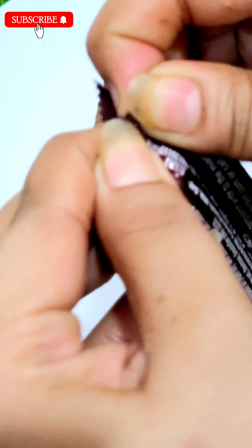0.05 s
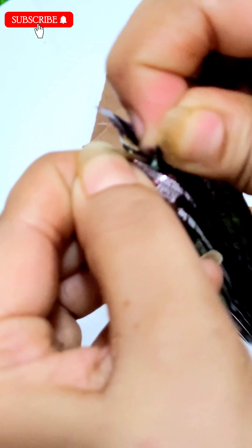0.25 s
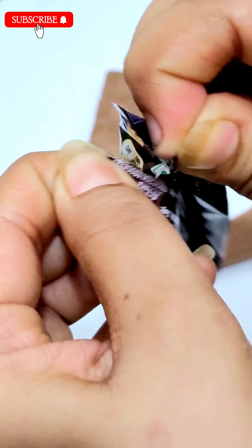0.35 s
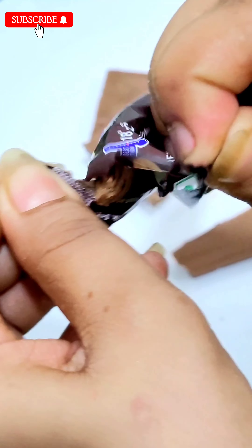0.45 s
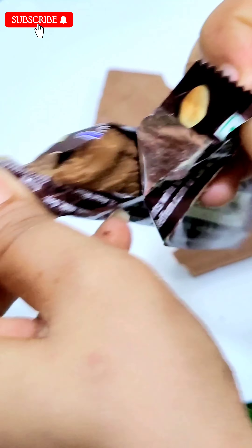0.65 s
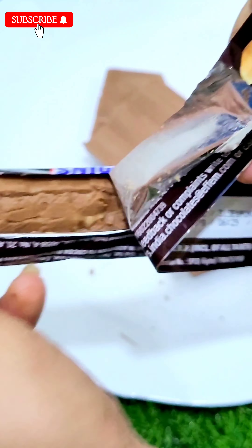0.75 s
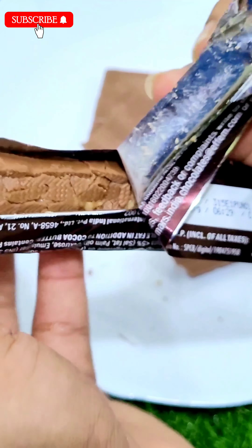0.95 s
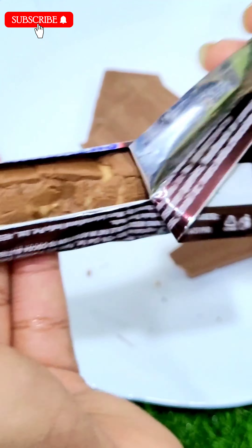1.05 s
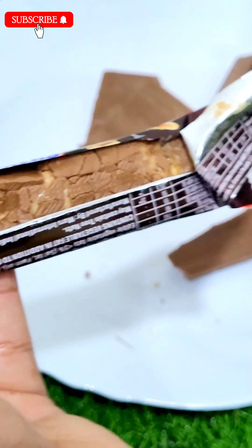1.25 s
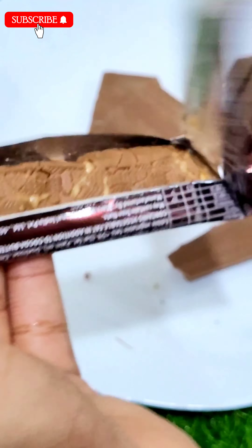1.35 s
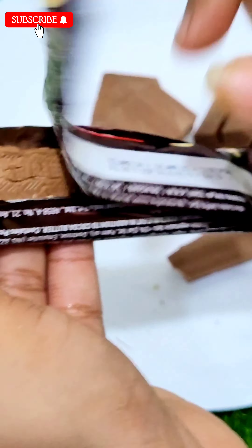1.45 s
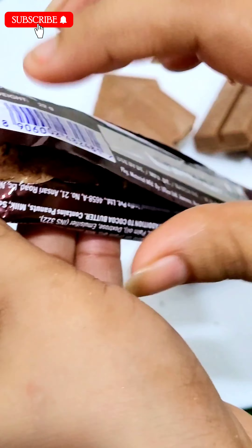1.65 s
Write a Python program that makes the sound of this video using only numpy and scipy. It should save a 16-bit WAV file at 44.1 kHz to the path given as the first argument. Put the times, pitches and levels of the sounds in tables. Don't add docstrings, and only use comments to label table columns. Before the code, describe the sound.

Plastic wrapper crinkling, close and crisp in stereo. Small ticks and faint rustles until 0.4 s, with a few sharper snaps; then dense bright crackling to 0.6 s, loudest crack near 0.53. Another hard tearing burst at 0.7-0.8 s, a brief lull, soft crackles and a dull finger knock near 1.05, brisk snapping 1.15-1.3, a small crackle at 1.4, then near quiet with low room hum.

```python
import sys
import numpy as np
from scipy import signal
from scipy.fft import rfft, irfft, next_fast_len
from scipy.io import wavfile
from scipy.ndimage import map_coordinates

SR = 44100
rng = np.random.default_rng(int(sys.argv[2]) if len(sys.argv) > 2 else 0)


def store_pcm(level_fs):
    pcm = np.round(np.clip(level_fs, -1, 1) * 32767).astype(np.int16)
    wavfile.write(sys.argv[1], SR, np.atleast_2d(pcm).T)


def convert_level_to_amplitude(level_db):
    exponent = np.asarray(level_db, float) / 20
    return 10 ** exponent


N = 74970

# centre_hz, width_hz, level_db
POUCH_MODES = [(930, 1020, -8.5), (1345, 382, 1), (2055, 490, -2)]
FILM_SHARED = 0.21
FOLD_WIDTH = 0.39
FILM_TOP_HZ = 15900


def unit(x):
    return x / np.sqrt(np.mean(x ** 2) + 1e-20)


def along(points, hz):
    point_hz, value = np.transpose(points)
    return np.interp(np.log(hz + 1), np.log(point_hz + 1), value)


def curves(rows):
    seconds, *columns = np.transpose(sorted(rows))
    return [np.interp(np.arange(N) / SR, seconds, column) for column in columns]


def wobble(knots_per_s):
    knots = rng.standard_normal(int(N * knots_per_s / SR) + 4)
    return map_coordinates(knots, [np.arange(N) * knots_per_s / SR])


def filtered(x, response):
    n = x.shape[-1]
    size = next_fast_len(n + 4096)
    return irfft(rfft(x, size) * response(np.fft.rfftfreq(size, 1 / SR)), size)[..., :n]


def resonances(modes):
    def response(f):
        total = 0
        for k, (centre, width, db) in enumerate(modes):
            damping = 1j * f * width
            total = total + (-1) ** k * convert_level_to_amplitude(db) * damping / (centre * centre - f * f + damping)
        return total
    return response


def pair(n, share):
    noise, share = rng.standard_normal((3, n)), np.clip(share, 0, 1)
    return np.sqrt(share) * noise[0] + np.sqrt(1 - share) * noise[1:]


def film(f):
    # hz, level_db
    film_colour = [(900, -23), (1600, -20), (2300, -12.5), (3500, -3), (5400, -3.5), (8700, -11),
                   (15600, -10), (16000, -56)]
    return convert_level_to_amplitude(along(film_colour, f))


def thin(f):
    return (1j * f / (2400 + 1j * f)) ** 2


def pouch(f, modes=POUCH_MODES):
    pan_db = 2 * np.array([[-1], [1]])
    return resonances(modes)(f) ** 2 * convert_level_to_amplitude(pan_db)


def pooled(x):
    return x + 0.65 * x.mean(axis=0)


def snaps():
    # start_s, peak_db, pitch_hz,
    # hollow_db (ring of the pouch)
    crease_snaps = [(0.0142, -33, 4420, -13.5), (0.0432, -23.5, 11940, -46), (0.0977, -33, 4720, -64),
                    (0.104, -39.5, 7200, -12.5), (0.1197, -35, 7400, -36), (0.139, -21.5, 6670, -32),
                    (0.1865, -23.5, 4700, -31), (0.2074, -26, 5700, -29.5), (0.211, -15, 4260, -45.5),
                    (0.278, -36.5, 7300, -36), (0.29, -42, 4700, -42), (0.299, -26, 12500, -32),
                    (0.325, -18.5, 6150, -33), (0.3364, -28, 7750, -22), (0.364, -32, 5860, -41.5),
                    (0.3818, -20, 10900, -42.5), (0.3917, -32.5, 7650, -38.5), (0.4362, -25.5, 5250, -30),
                    (0.442, -13.5, 5460, -35.5), (0.4523, -12.5, 5700, -27.5), (0.4754, -17, 4750, -13),
                    (0.5006, -13.5, 3500, -32), (0.5154, -18, 10400, -13), (0.528, -21, 5180, -20),
                    (0.5303, -6.5, 4930, -24), (0.5732, -23, 5260, -15), (0.6046, -30, 4900, -2.5),
                    (0.6156, -21, 3450, -17.5),
                    (0.6676, -20, 5500, -35), (0.6719, -14.5, 11500, -26), (0.698, -16.5, 5070, -29),
                  (0.718, -15, 7060, -18.5), (0.7189, -8.5, 4960, -20), (0.7313, -8.5, 5260, -11),
                  (0.7462, -26.5, 11600, -3.5), (0.7608, -10.5, 5070, -16), (0.7671, -9, 4700, -16),
                  (0.796, -26, 4900, -11), (0.9129, -30.5, 4260, -39), (0.961, -28, 5100, -12),
                  (0.9707, -22, 3080, -41), (0.9915, -26.5, 11200, -13.5), (1.0092, -21.5, 4900, -16),
                  (1.021, -26.5, 4360, -34), (1.0316, -20, 5600, -19), (1.0467, -22, 4330, -5.5),
                  (1.0534, -27, 3350, -5), (1.117, -17, 5140, -6.5),
                    (1.1446, -33, 12000, -16), (1.1526, -20, 9900, -16), (1.1649, -12.5, 4130, -20),
                  (1.2102, -20.5, 5500, -13.5), (1.225, -14, 5330, -24), (1.255, -22, 5230, -35),
                  (1.2587, -13, 8200, -28), (1.2617, -11, 6200, -27.5), (1.3093, -28, 5270, -18.5),
                  (1.3962, -26, 7500, -31), (1.4028, -31.5, 4680, -22), (1.417, -28.5, 3390, -22),
                  (1.4988, -28, 6270, -33), (1.5655, -39.5, 5600, -24), (1.5704, -35, 5600, -21),
                  (1.619, -43.5, 6230, -27.5)]
    # centre_hz, width_hz, level_db
    slack_modes = [(816, 910, -4.5), (1420, 1100, -2)]
    flap_open_s = 0.9
    t60_s, rattle_t60_s, rattle_db = 0.012, 0.035, -5
    lead_s, lead_db = 0.002, -3

    out, ahead = np.zeros((2, N + SR)), round(0.008 * SR)
    t = (np.arange(round(0.07 * SR)) - ahead) / SR
    after = np.maximum(t, 0)
    decay = convert_level_to_amplitude(-60 * after / t60_s) + convert_level_to_amplitude(rattle_db - 60 * after / rattle_t60_s)
    strain = convert_level_to_amplitude(lead_db) * np.exp(np.minimum(t, 0) / lead_s)
    shape = np.where(t < 0, strain, decay)
    for start, db, hz, hollow_db in crease_snaps:
        burst = pair(len(t), FILM_SHARED) * shape
        burst[:, ahead] += convert_level_to_amplitude(13) * np.sign(burst[0, ahead])
        fold = resonances([(hz, FOLD_WIDTH * hz, -1)])
        crack = filtered(burst, lambda f: film(f) + fold(f) ** 2 * thin(f) * (f < FILM_TOP_HZ))
        modes = POUCH_MODES[:2] if start < flap_open_s else slack_modes
        ring = filtered(pooled(burst), lambda f: pouch(f, modes))
        both = crack / np.abs(crack).max(axis=1, keepdims=True)
        both = both + convert_level_to_amplitude(hollow_db + 2) * ring / np.abs(ring).max()
        out[:, round(start * SR) - ahead:][:, :len(t)] += convert_level_to_amplitude(db - 1) * both
    return out[:, :N]


def cracks():
    # start_s, peak_db, pitch_hz
    dry_cracks = [(.0155, -30.5, 3830), (.0434, -21.5, 11200), (.0748, -42, 2470), (.1196, -37, 5850),
                  (.15, -32, 5700), (.1878, -33, 5700), (.2063, -34, 6800), (.3242, -16.5, 5860),
                  (.3813, -20.5, 14000), (.3815, -18.5, 5280), (.4422, -17.5, 6000), (.4532, -14.5, 6100),
                  (.4748, -21, 6200), (.484, -21, 13400), (.4914, -21, 5760), (.5305, -3, 4940),
                  (.542, -18, 5300), (.7311, -14, 5100), (.8747, -40, 3600), (.8972, -43, 5500),
                  (1.0214, -28.5, 4430), (1.0314, -19, 5470), (1.1068, -27, 4560), (1.1523, -16, 5070),
                  (1.2103, -14.5, 6540), (1.2375, -21.5, 5200), (1.3094, -16, 5760), (1.395, -24.5, 3660),
                  (1.402, -21, 4760), (1.478, -46, 3700), (1.605, -43, 6800), (1.6177, -42.5, 6000)]
    t60_s, width, shared = 0.0037, 0.52, 0.3

    out, t = np.zeros((2, N + SR)), np.arange(round(0.02 * SR)) / SR
    for start, db, hz in dry_cracks:
        burst = pair(len(t), shared) * convert_level_to_amplitude(-60 * t / t60_s)
        fold = resonances([(hz, width * hz, 0)])
        crack = filtered(burst, lambda f: 0.4 * film(f) + fold(f) ** 2 * thin(f) * (f < FILM_TOP_HZ))
        out[:, round(start * SR):][:, :len(t)] += convert_level_to_amplitude(db) * crack / np.abs(crack).max(axis=1, keepdims=True)
    return out[:, :N]


def rips():
    # start_s, length_s, level_db, pitch_hz
    short_rips = [(0, 0.0043, -43, 5540), (.1355, 0.0035, -29, 6300), (.29, 0.011, -39.5, 5930),
                  (0.335, 0.0081, -40, 5800), (0.363, .007, -49, 11800), (0.378, 0.0081, -41, 7600),
                  (0.462, 0.0043, -28, 12400), (.5255, 0.0027, -20, 5200), (0.607, .004, -41.5, 9900),
                  (.667, 0.007, -25, 5600), (0.674, 0.01, -32.5, 4960), (0.689, 0.0057, -39, 4970),
                  (.717, 0.0032, -23.5, 7150), (0.956, 0.0067, -41.5, 5000), (1.0194, 0.0042, -31.5, 4600),
                  (1.1416, 0.007, -29.5, 6000), (1.248, .005, -31, 4630), (1.261, 0.0029, -32, 7400),
                  (1.298, .004, -37.5, 7000), (1.608, 0.007, -54.5, 5700)]
    edge_s, rough_db = 0.0019, 0

    out, t = np.zeros((2, N + SR)), np.arange(round(0.03 * SR)) / SR
    rough = convert_level_to_amplitude(rough_db * wobble(900))
    for start, length, db, hz in short_rips:
        fold = resonances([(hz, FOLD_WIDTH * hz, -1)])
        rush = filtered(pair(len(t), FILM_SHARED), lambda f: film(f) + fold(f) ** 2 * (f < FILM_TOP_HZ))
        shape = np.minimum(t / edge_s, 1) * np.exp(-np.maximum(t - length, 0) / edge_s)
        out[:, round(max(start, 0) * SR):][:, :len(t)] += convert_level_to_amplitude(db) * unit(rush) * shape
    return out[:, :N] * rough


def grains(per_s):
    spread_db, largest, t60_s, hiss_db, clump_db = 1.5, 1.3, 0.0032, 3, 1.5
    sizes_db = spread_db * np.minimum(rng.exponential(size=N), largest)
    creases = (rng.random(N) < per_s / SR) * convert_level_to_amplitude(sizes_db)
    decay = convert_level_to_amplitude(-60 * np.arange(SR // 50) / SR / t60_s)
    gate = unit(np.convolve(creases, decay)[:N]) + convert_level_to_amplitude(hiss_db)
    return unit(pair(N, FILM_SHARED) * gate * convert_level_to_amplitude(clump_db * wobble(59.82)))


def crinkle():
    # start_s, effort_db, open_db (pouch)
    fidgeting = [(0, -59, -1), (.1, -58.5, -9), (.2, -47.5, -22), (.23, -46.5, -47), (.28, -55.5, -45.5),
                 (.34, -52.5, -6.5), (.4, -58.5, -25.5)]
    # start_s, effort_db, open_db (pouch)
    long_pulls = [
        [(.432, -51, -47), (.465, -29.5, -11), (.5, -29.5, -9), (.545, -31, -9.5), (.59, -37.5, -13.5),
         (.62, -38.5, -19), (.66, -57, -9), (.7, -45, -8)],
        [(.714, -41, -20), (.722, -33.5, -11), (.77, -30, -18.5), (.8, -31.5, -13.5), (.85, -51, -11),
         (.9, -55, -26), (.95, -62, -34)],
        [(.96, -47.5, -12.5), (1.04, -46.5, -7), (1.06, -45.5, -8), (1.138, -44, -7), (1.15, -35, -14),
         (1.24, -37.5, -14.5), (1.31, -37, -11), (1.33, -50.5, -42)],
        [(1.378, -54, -26), (1.392, -50, -20), (1.397, -40, -18), (1.44, -58.5, -12), (1.49, -64, -18),
         (1.62, -64, -7), (1.7, -68, -18)],
    ]
    # start_s, treble_db
    tautness = [(.2, -1), (.3, 2.5), (.42, 10.5), (.47, 3.5), (.62, -2.5), (.7, -3), (.74, -5.5), (.82, 2),
                (.92, -7.5), (1.05, 2), (1.38, 0.5)]
    effort_db, open_db = curves(fidgeting + [row for pull in long_pulls for row in pull])
    taut_db, = curves(tautness)

    def dull(f):
        return 1 / np.sqrt(1 + (f / 4900) ** 8)

    def sharp(f):
        return np.sqrt(1 - dull(f) ** 2)

    wide = grains(900)
    split = filtered(grains(620), dull) + filtered(grains(980), sharp)
    bright = unit(filtered(wide + convert_level_to_amplitude(-19) * split, film))
    hollow = unit(filtered(pooled(0.45 * wide + grains(300)), pouch))
    low = filtered(bright, dull)
    bright = low + convert_level_to_amplitude(taut_db) * (bright - low)
    return convert_level_to_amplitude(effort_db) * (bright + convert_level_to_amplitude(open_db) * hollow)


def fingers():
    # start_s, level_db, scrape_db (over the level)
    grip = [(0, -52.5, -11), (.05, -63, -12), (.078, -49, -14), (.17, -58, -12), (.3, -66, -5),
            (.44, -69.5, -13), (.485, -49, -4.5), (.56, -54.5, -11), (.65, -58.5, -17.5),
            (.73, -54.5, -10.5), (.81, -51.5, 10), (.9, -60.5, -10.5), (1.02, -60.5, -1.5),
            (1.05, -46.5, -0.5), (1.3, -46, -4), (1.35, -63, -4), (1.6, -63.5, -17), (1.7, -63, -10.5)]
    # start_s, peak_db
    thuds = [
        (0.0749, -34),
        (.482, -31.5),
        (0.533, -29),
        (0.7178, -22),
        (1.046, -19),
        (1.1165, -46),
        (1.393, -33.5),
    ]
    # centre_hz, width_hz, level_db
    bar_modes = [(236, 95, -7), (293.6, 71.6, 1.5), (365, 110.4, -2.5)]
    skin_modes = [(559, 510, 0.35), (920, 550, 0.67)]
    grip_db, scrape_db = curves(grip)

    rub = convert_level_to_amplitude(1.35 * wobble(70))
    creep = unit(filtered(pair(N, 0.92) * rub, resonances(bar_modes)))
    rasp = pair(N, 0.56) * rub * convert_level_to_amplitude(2.8 * wobble(140))
    scrape = unit(filtered(rasp, lambda f: resonances(skin_modes)(f) ** 2))
    blows = np.zeros(N)
    for start, db in thuds:
        blows[round(start * SR)] = convert_level_to_amplitude(db + 33.5)

    def soft_blow(f):
        return resonances(bar_modes)(f) / (1 + 1j * f / 500) + convert_level_to_amplitude(-22) * resonances(skin_modes)(f)

    return convert_level_to_amplitude(grip_db) * (creep + convert_level_to_amplitude(scrape_db) * scrape) + filtered(blows, soft_blow)


def room(x):
    # hz, t60_s
    decay_times = [(200, 0.19), (2000, 0.32), (12000, 0.13)]
    hz, t, noise = signal.stft(rng.standard_normal((2, SR // 3)), SR, nperseg=256)
    decay = convert_level_to_amplitude(-60 * t / along(decay_times, hz)[:, None])
    tail = signal.istft(noise * decay, SR, nperseg=256)[1]
    return signal.fftconvolve(x, tail / np.linalg.norm(tail[0]), axes=1)[:, :N]


def hum():
    # hz, level_db (per Hz)
    hum_colour = [(24, -34), (40, -4), (86, 2), (113, 0), (140, -10), (190, -7.5), (250, -42.5),
                  (420, -120)]
    return convert_level_to_amplitude(-62.5) * unit(filtered(pair(N, 0.93), lambda f: convert_level_to_amplitude(along(hum_colour, f))))


def scene():
    # start_s, lean_db (left over right)
    lean = [(.25, -0.5), (.33, 3), (.46, 3), (.52, -2), (.7, 0.7)]
    lean_db, = curves(lean)
    lag_s = np.array([[0], [0.0001]])
    folds = snaps() + cracks() + rips()
    near = folds * convert_level_to_amplitude(lean_db * np.array([[0.5], [-0.5]])) + crinkle() + fingers()
    near = filtered(near, lambda f: np.exp(-2j * np.pi * f * lag_s))
    return near + convert_level_to_amplitude(-13.5) * room(near) + hum()


def low_pass(x):
    return signal.sosfilt(signal.butter(12, 16980, fs=SR, output="sos"), x)


def record(dry):
    left_s = (N - np.arange(N)) / SR
    mix = dry * np.clip(left_s / 0.08, 0.3, 1)
    return low_pass(mix)


dry = scene()
out = record(dry)
store_pcm(out)
```